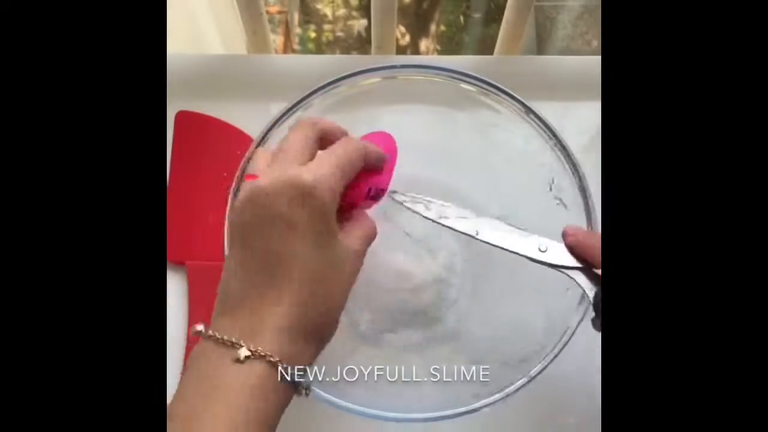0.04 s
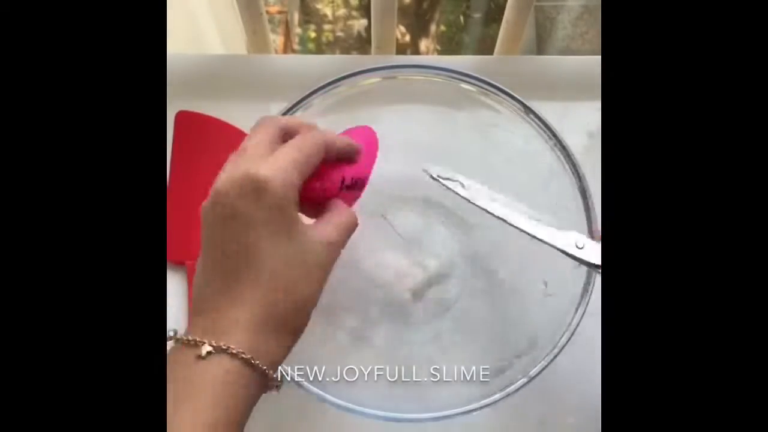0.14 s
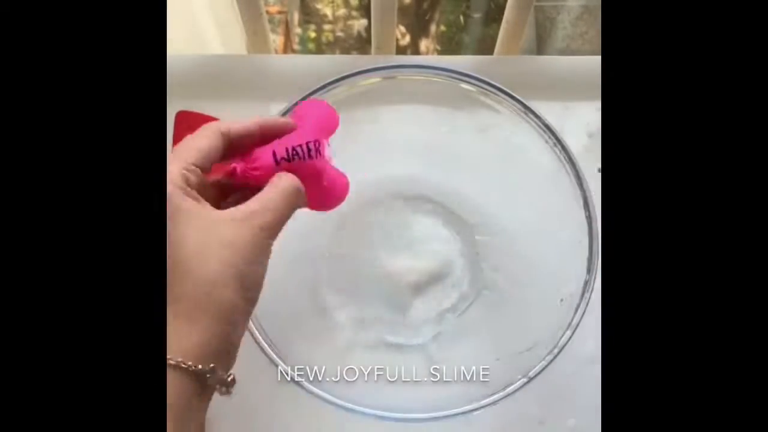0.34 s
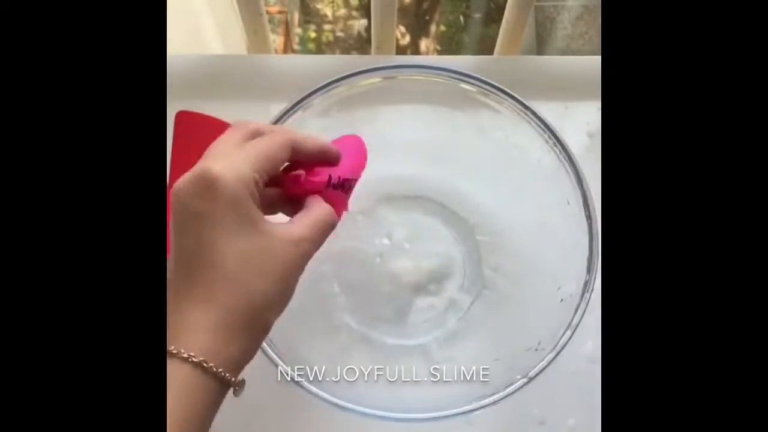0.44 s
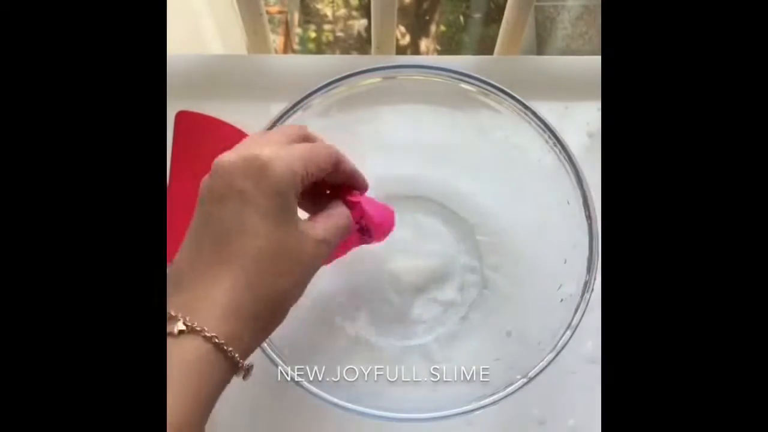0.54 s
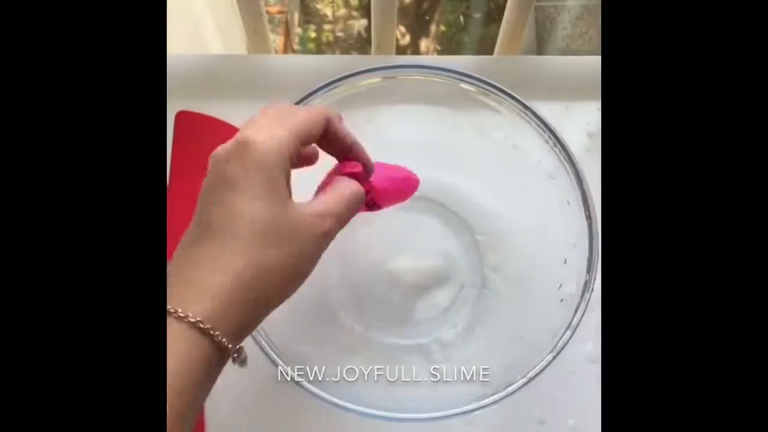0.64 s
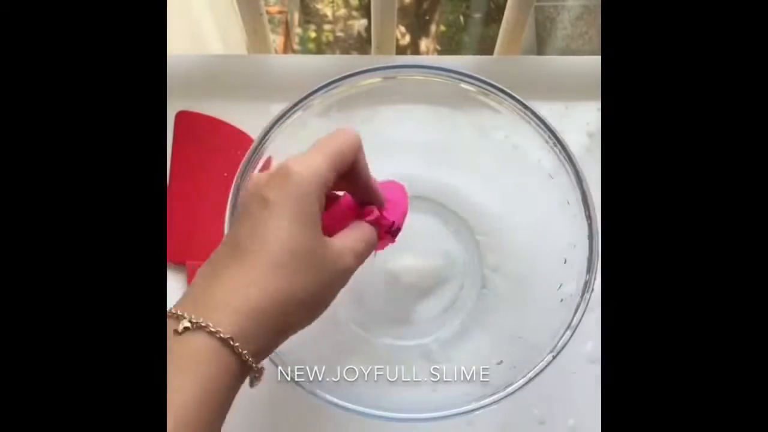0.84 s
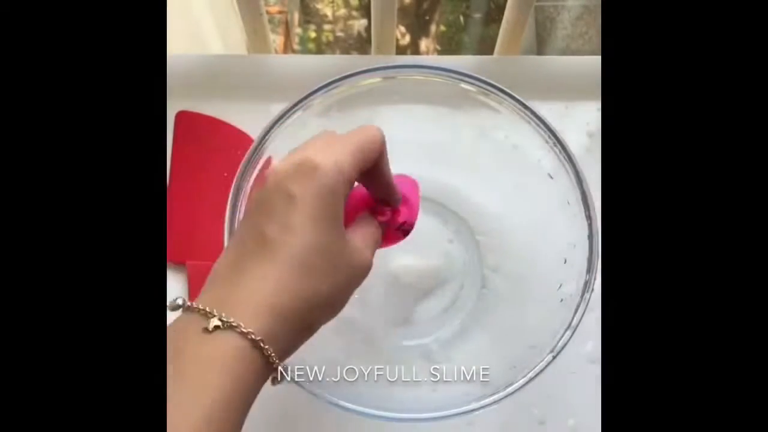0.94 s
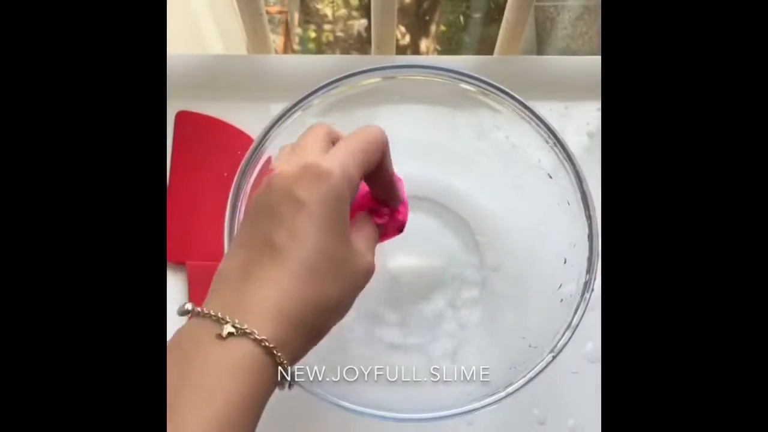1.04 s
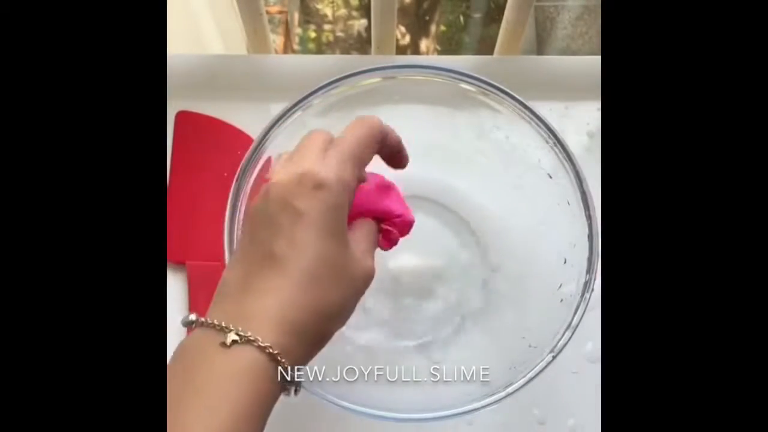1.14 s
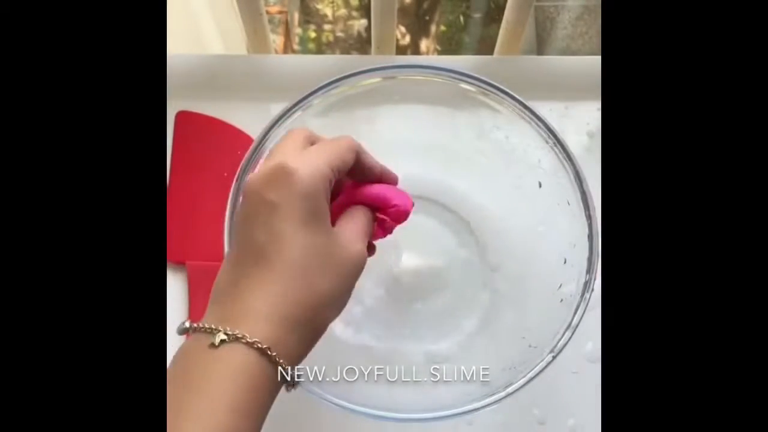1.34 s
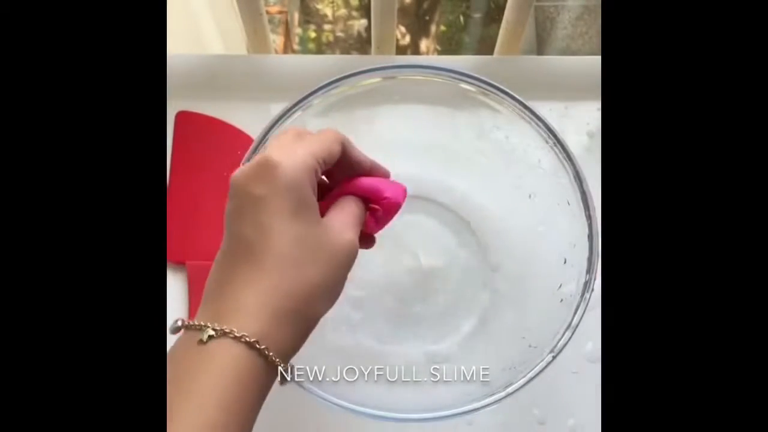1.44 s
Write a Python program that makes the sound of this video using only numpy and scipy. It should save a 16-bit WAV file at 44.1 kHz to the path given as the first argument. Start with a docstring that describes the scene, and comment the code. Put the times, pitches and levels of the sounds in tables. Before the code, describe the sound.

A water-filled rubber ball is snipped and squirts sharply with a squeaky chirp; then droplet clicks, rubber rustle and a few dull knocks on a glass bowl, close up in a quiet room with faint low hum.

```python
"""In a quiet room, scissors snip a water-filled rubber ball over a glass bowl.
A short squirt of noise and droplet pings comes out with whistles, gliding narrow bands of noise.
Knocks on the bowl are thuds of noise with ringing sine tones; droplets are snaps with noise bursts.
Wet rubber rustles in the fingers as patches of crackle, and hands bump the table as low noise.
Behind it lie a motor's hum, made of wavering sines, and the room's air, made of coloured noise."""
import sys
import numpy as np
from scipy import signal
from scipy.fft import rfft, irfft
from scipy.io import wavfile

SR = 44100
rng = np.random.default_rng(int(sys.argv[2]) if len(sys.argv) > 2 else 0)


def rack_gain(trim_db):
    """Turn a fader trim in dB into the linear factor to multiply a signal by."""
    fader = np.asarray(trim_db, float)
    return 10 ** (fader / 20)


def output_pcm(signal):
    """Save a mono or channel-first signal as 16-bit PCM at the path in sys.argv[1].

    Samples are clipped to [-1, 1] before scaling.
    """
    pcm = np.clip(np.atleast_2d(signal).T, -1, 1) * 32767
    wavfile.write(sys.argv[1], SR, np.round(pcm).astype(np.int16))


N = 66150


def evened(x):
    """Scales to rms 1."""
    return x / np.sqrt(np.mean(x ** 2) + 1e-20)


def coloured(x, points):
    """Filters x by a spectrum table and scales it to rms 1."""
    f, db = np.transpose(points)
    hz = np.fft.rfftfreq(len(x), 1 / SR)
    gain = rack_gain(np.interp(np.log(hz + 1), np.log(f + 1), db))
    return evened(irfft(rfft(x) * gain, len(x)))


def band(x, hz, width_hz):
    """Passes x twice through a resonance and scales it to rms 1."""
    r = np.exp(-np.pi * width_hz / SR)
    a = [1, -2 * r * np.cos(2 * np.pi * min(hz, SR / 2.2) / SR), r * r]
    once = signal.lfilter([1], a, x)
    return evened(signal.lfilter([1, 0, -1], a, once))


def level(table):
    """Gain over time from a level curve, practically silent outside it."""
    s, db = np.transpose(table)
    return rack_gain(np.interp(np.arange(N) / SR, s, db, -120, -120))


def add(mix, s, sound):
    """Mixes a sound in at time s."""
    part = mix[round(s * SR):][:len(sound)]
    part += sound[:len(part)]


def slow(rate_hz):
    """Random wander of rms 1: twelve sines, the fastest at rate_hz."""
    t = np.arange(N) / SR
    rates = np.geomspace(rate_hz / 20, rate_hz, num=12)
    return evened(sum(np.sin(2 * np.pi * (f * t + rng.random())) for f in rates))


# colour of the room air: (frequency [Hz], level [dB per Hz])
AIR_COLOUR = [(20, -28), (60, -30.5), (110, 2.5), (130, -9), (290, -3), (480, -16.5), (690, -15.5),
              (870, -17.5), (1200, -25), (2400, -26), (5000, -36.5), (13500, -40.5)]
AIR_DB, AIR_WANDER_DB = -49, 2
AIR_START_DB, AIR_RISE_S = -4, 0.069  # the room noise is a little lower at first


def air():
    """Room noise that breathes slightly."""
    start = AIR_START_DB * np.clip(1 - np.arange(N) / SR / AIR_RISE_S, 0, 1)
    gain = rack_gain(AIR_DB + AIR_WANDER_DB * slow(25.129) + start)
    return gain * coloured(rng.standard_normal(N), AIR_COLOUR)


SHAFT_HZ, HUM_WAVER_DB = 24.143, 1.684
# tones of the motor: (multiple of the shaft rate [-], rms level before the waver [dB])
HUM_TONES = [(3, -55), (4, -45), (6, -58.5), (7, -59.5), (12, -55.5), (15, -59.5)]


def hum():
    """Whole multiples of a motor's shaft rate, each wavering in level."""
    t = np.arange(N) / SR
    out = np.zeros(N)
    for multiple, db in HUM_TONES:
        gain = np.sqrt(2) * rack_gain(db + HUM_WAVER_DB * slow(4.1))
        hz = int(round(multiple)) * SHAFT_HZ
        out += gain * np.sin(2 * np.pi * (hz * t + rng.random()))
    return out


GRAINS_PER_S = 1200  # at each pitch
GRAIN_SPREAD_DB, GRAIN_WIDTH = 0.5, 0.271  # width as a share of the pitch


def grains(size):
    """Tiny droplets: short pings of uneven strength at many pitches."""
    out = np.zeros(size)
    for hz in np.geomspace(1200, 14000, num=14):
        strength = rack_gain(GRAIN_SPREAD_DB * np.minimum(rng.exponential(1, size), 3))
        hits = strength * (rng.random(size) < GRAINS_PER_S / SR)
        out += np.sqrt(hz) * band(hits * rng.standard_normal(size), hz, GRAIN_WIDTH * hz)
    return evened(out)


# wet rubber: (start [s], length [s], level [dB], middle [Hz], distance from middle to -6 dB [octaves])
RUSTLE_PATCHES = [(0.058, 0.4725, -55, 9346, 2.692), (0.198, 0.12467, -47, 9810, 6.27),
                  (0.315, 0.05901, -45, 6490, 7.68), (0.379, 0.12795, -56.5, 4571, 1.125),
                  (0.448, 0.05191, -41.5, 6520, 1.0786), (0.521, 0.008386, -43, 3082, 1.133),
                  (0.71, 0.05125, -54.5, 4081, 1.455), (0.882, 0.0822, -53, 6812, 0.8746),
                  (0.979, 0.05422, -61, 6010, 2.304), (1.229, 0.2109, -54.5, 12430, 1.1945),
                  (1.369, 0.037704, -43.5, 4389, 1.665), (1.457, 0.0736, -52.5, 12960, 0.3574)]
RUSTLE_HISS = 0.9674  # smooth noise mixed with the grains
RUSTLE_RISE_S, RUSTLE_FADE_DB = 0.004754, -13.5  # the fade reached after one length


def rustle():
    """Wet rubber in the fingers: patches of dense crackle that start fast and fade."""
    out = np.zeros(N)
    for s, length, db, hz, octaves in RUSTLE_PATCHES:
        t = np.arange(0, 2 * length, 1 / SR)
        hump = [(hz * 2 ** (k * octaves), -6 * k * k) for k in range(-3, 4)]
        hiss = RUSTLE_HISS * rng.standard_normal(len(t))
        crackle = coloured(hiss + grains(len(t)), hump)
        fade = rack_gain(db + RUSTLE_FADE_DB * (t / length) ** 2)
        add(out, s, fade * np.minimum(t / RUSTLE_RISE_S, 1) * crackle)
    return out


# hands on the table: (middle [s], level before evening out and filtering [dB], pitch [Hz], length [s])
HAND_BUMPS = [(0.166, -33.5, 156.3, 0.03312), (0.245, -40.5, 148.2, 0.09565), (0.297, -39, 104.1, 0.04657),
              (.845, -42.5, 160.4, 0.0524), (0.863, -42.5, 334.7, 0.0615), (0.836, -53, 837.3, 0.02659),
              (1.112, -44.5, 276, 0.05247)]


def bumps():
    """Soft low pushes of the hands through the table: broad bands of noise that swell and fade."""
    out, t = np.zeros(N), np.arange(-.08, .08, 1 / SR)
    noise = rng.standard_normal((len(HAND_BUMPS), len(t)))
    for z, (s, db, hz, length) in zip(noise, HAND_BUMPS):
        push = band(z, hz, hz)
        steady = push / (np.abs(signal.hilbert(push)) + .5) * 2  # evens out the noise's own swells
        add(out, s + t[0], rack_gain(db) * np.exp(-(2 * t / length) ** 2) * steady)
    return signal.sosfilt(signal.butter(4, 70, "high", fs=SR, output="sos"), out)


# droplets and wet clicks: (time [s], level of the burst [dB], pitch [Hz], time to fall 60 dB [s])
DROPLETS = [(0.23, -37, 10010, 0.0284), (0.261, -35.5, 9251, 0.0158), (0.314, -44.5, 8426, 0.0266),
            (0.327, -40.5, 6638, 0.02579), (0.4522, -26, 3870, 0.01417), (0.483, -26, 10720, 0.012995),
            (0.5193, -33.5, 2985, 0.00901), (0.766, -47.5, 8292, 0.02257), (1.026, -43.5, 3220, 0.00846),
            (1.106, -42, 4092, 0.01719), (1.2208, -44, 4086, 0.0166), (1.2293, -33.5, 12400, 0.01946),
            (1.2406, -24, 13230, 0.01347), (1.247, -28, 11610, 0.007345), (1.2522, -34.5, 11530, 0.01783),
            (1.3264, -39, 8167, 0.017104), (1.4551, -42.5, 12350, 0.01472), (1.475, -38.5, 11830, 0.0143),
            (1.4904, -38, 11880, 0.01016)]
DROP_WIDTH = 0.144  # as a share of the pitch
DROP_SNAP_DB, DROP_SNAP_CYCLES = 4.5, 0.6145  # envelope peak over the burst, and when it comes


def drops():
    """Each click is a snap of a cycle or two, with a burst of noise around its pitch."""
    out, t = np.zeros(N), np.arange(3000) / SR
    noise = rng.standard_normal((len(DROPLETS), len(t)))
    for z, (s, db, hz, t60) in zip(noise, DROPLETS):
        cycles = t * hz / DROP_SNAP_CYCLES
        snap = rack_gain(DROP_SNAP_DB) * cycles * np.exp(1 - cycles) * np.sin(2 * np.pi * hz * t)
        rise = np.minimum(t / 0.001074, 1)
        burst = rack_gain(-60 * t / t60) * rise * band(z, hz, DROP_WIDTH * hz)
        add(out, s, rack_gain(db) * (snap + burst))
    return out


# whistles of the slit and of bubbles: (peak time [s], level before evening out [dB], pitch at peak [Hz],
# rise [s], time to fall 60 dB [s], width [Hz], glide [Hz per ms])
WHISTLE_TONES = [(0.1147, -11, 3900, 0.004821, 0.00985, 30.2, 38),
                 (0.119, -9, 2649, 0.002436, 0.05141, 316.6, 0.5),
                 (0.169, -13, 2557, 0.006898, 0.04431, 150.6, -2.5),
                 (.393, -40.5, 1770, 0.001913, 0.0194, 80, 7),
                 (0.4337, -29, 1797, 0.001819, 0.03187, 69.9, -2.5),
                 (0.464, -29.5, 3370, 0.007376, 0.06332, 602.4, -31),
                 (0.472, -38.5, 5938, 0.001199, 0.0099, 293, 7),
                 (0.734, -45.5, 2961, 0.008885, 0.1206, 584.7, 0),
                 (1.374, -29.5, 3727, 0.00391, 0.023, 433.8, -16)]


def whistles():
    """Narrow noisy tones from the slit and bubbles that swell, glide and die."""
    out, t = np.zeros(N), np.arange(-.02, .15, 1 / SR)
    noise = rng.standard_normal((len(WHISTLE_TONES), len(t)))
    for z, (s, db, hz, rise, t60, width_hz, glide) in zip(noise, WHISTLE_TONES):
        tone = signal.hilbert(band(z, hz, width_hz))
        ms = np.clip(1000 * t, -10, 10)  # the glide stops 10 ms either side of the peak
        tone = tone * np.exp(2j * np.pi * np.cumsum(glide * ms) / SR)
        swell = np.exp(-(t / rise) ** 2) * (t > -1.6 * rise)
        shape = np.where(t < 0, swell, rack_gain(-60 * t / t60))
        steady = tone.real / (np.abs(tone) + 0.2378)  # evens out the noise's own swells
        add(out, s + t[0], rack_gain(db) * shape * steady)
    return out


# loudness of the squirt through the cut: (time [s], level [dB])
SQUIRT_LEVEL = [(.107, -34.5), (.109, -29), (.115, -30.5), (.12, -11.5), (.128, -27), (.148, -23),
                (.158, -32), (.168, -22), (.18, -42.5), (.2, -49.5), (.23, -61.5)]
# colour of the spray: (frequency [Hz], level [dB per Hz])
SPRAY_COLOUR = [(350, -57), (600, -22), (1080, -31), (2560, -5), (4550, -11), (13200, -16), (14500, -15.5)]
SPRAY_HISS = .9  # smooth noise mixed with the grains


def squirt():
    """Spray of water forced through the cut: hiss and tiny droplets under a level curve."""
    gain = level(SQUIRT_LEVEL)[:SR // 4]
    hiss = SPRAY_HISS * rng.standard_normal(len(gain))
    spray = gain * coloured(hiss + grains(len(gain)), SPRAY_COLOUR)
    return np.pad(spray, (0, N - len(gain)))


# knocks on the bowl: (time [s], thud [dB], first mode [dB], second mode [dB], third mode [dB])
BOWL_KNOCKS = [(0.2405, -29.5, -39.5, -40.5, -36), (0.434, -44.5, -73, -55.5, -83),
               (0.5, -70.5, -77, -81.5, -53), (1.104, -34, -44, -58, -71),
               (1.221, -38.5, -64, -60.5, -67.5)]
# pitches of the four ringing modes of the glass: (frequency [Hz])
MODE_HZ = [861, 1050, 2444, 4360]
# their shapes in time: (first fade to -60 dB [s], swell [s], lingering ring over the first fade [dB])
MODE_SHAPES = [(0.15931, 0.0026, -42.5), (0.1431, 0.0047, -14), (0.12098, 0.02462, -11),
               (0.13701, 0.02269, -36.5)]
# colour of the thud: (frequency [Hz], level [dB per Hz])
THUD_COLOUR = [(150, -45.5), (300, 10.5), (700, -13.5), (1200, -1), (1700, -10), (2400, -5), (3200, -19.5),
               (9000, -22.5), (13000, -36)]
THUD_T60_S = 0.07887
BODY_HZ, BODY_DB, BODY_T60_S = 763.52, 2.5, 0.05235  # short hollow body, level over the thud
CRACK_HZ, CRACK_DB, CRACK_T60_S = 1876.7, 1, 0.002026  # hard front, level over the thud
FOURTH_MODE_DB = -3.5  # over the third
LINGER_T60_S = .75  # a quieter ring outlasts the first fade


def knocks():
    """A dull thud of noise and the ringing modes of the glass, each swelling before it fades."""
    out, t = np.zeros(N), np.arange(SR // 2) / SR
    noise = rng.standard_normal((len(BOWL_KNOCKS), len(t)))
    linger = rack_gain(-60 * t / LINGER_T60_S)
    for z, (s, thud_db, first_db, second_db, third_db) in zip(noise, BOWL_KNOCKS):
        thud = rack_gain(thud_db - 60 * t / THUD_T60_S) * np.minimum(t / 0.0004, 1) * coloured(z, THUD_COLOUR)
        body = rack_gain(thud_db + BODY_DB - 60 * t / BODY_T60_S) * np.minimum(t / 0.0042, 1)
        body = body * band(z, BODY_HZ, BODY_HZ / 4)
        crack = rack_gain(thud_db + CRACK_DB - 60 * t / CRACK_T60_S) * band(z, CRACK_HZ, CRACK_HZ / 2)
        ring = np.zeros(len(t))
        mode_db = (first_db, second_db, third_db, third_db + FOURTH_MODE_DB)
        for db, hz, (t60, swell, linger_db) in zip(mode_db, MODE_HZ, MODE_SHAPES):
            fade = rack_gain(-60 * (t / t60) ** 2) + rack_gain(linger_db) * linger
            rise = 1 - np.exp(-(t / swell) ** 2)
            ring += rack_gain(db) * fade * rise * np.sin(2 * np.pi * hz * t)
        waver = rack_gain(2 * slow(59.18)[:len(t)])  # a random waver roughens the ring
        add(out, s, thud + body + crack + ring * waver)
    return out


ROOM_DB, ROOM_T60_S = -11, 0.162


def room(x):
    """A short diffuse tail: fading noise that starts 4 ms after the sound."""
    t = np.arange(SR // 3) / SR
    tail = rng.standard_normal(len(t)) * rack_gain(-60 * t / ROOM_T60_S) * (t > .004)
    return signal.fftconvolve(x, tail / np.linalg.norm(tail))[:N]


def scene():
    """All sources, one microphone."""
    near = squirt() + whistles() + drops() + knocks()
    echoed = near + rack_gain(ROOM_DB) * room(near)
    return (echoed + bumps() + rustle() + hum() + air())[None]


def top_cut(x):
    """Nothing passes above the cut-off."""
    return signal.sosfilt(signal.butter(12, 14910, fs=SR, output="sos"), x)


HIGH_EDGE_HZ, LOW_EDGE_HZ = 14050, 30


def record(dry):
    """Trims the top and the bottom of the spectrum."""
    lowpass = signal.firwin(511, HIGH_EDGE_HZ, window=("kaiser", 8), fs=SR)
    cut = signal.oaconvolve(dry, lowpass[None], "same")
    mix = signal.sosfilt(signal.butter(2, LOW_EDGE_HZ, "high", fs=SR, output="sos"), cut)
    return top_cut(mix)


dry = scene()
out = record(dry)
output_pcm(out)
```